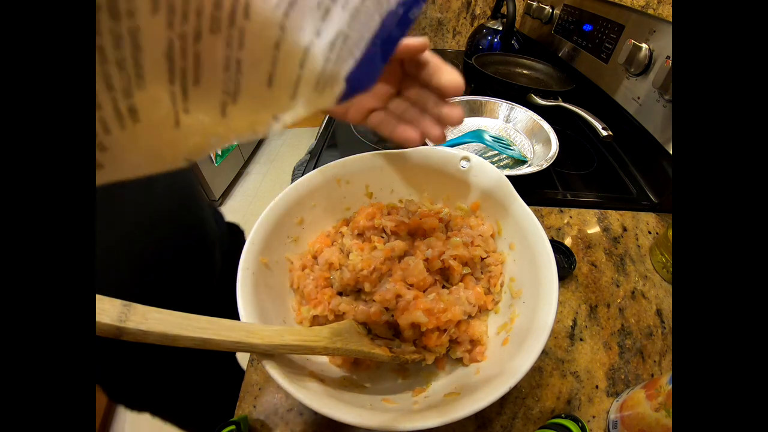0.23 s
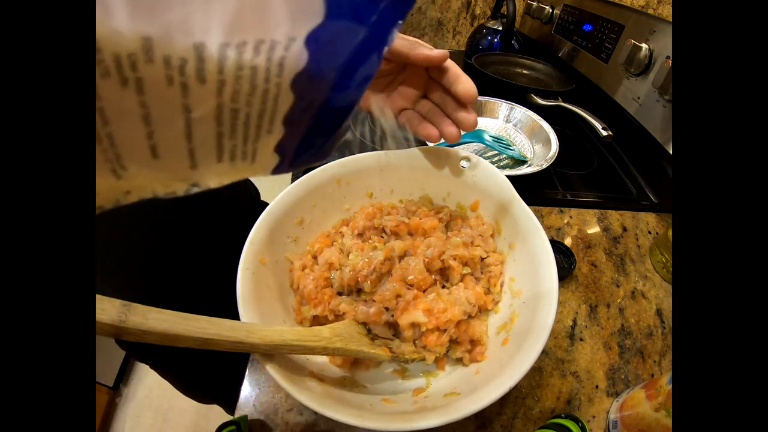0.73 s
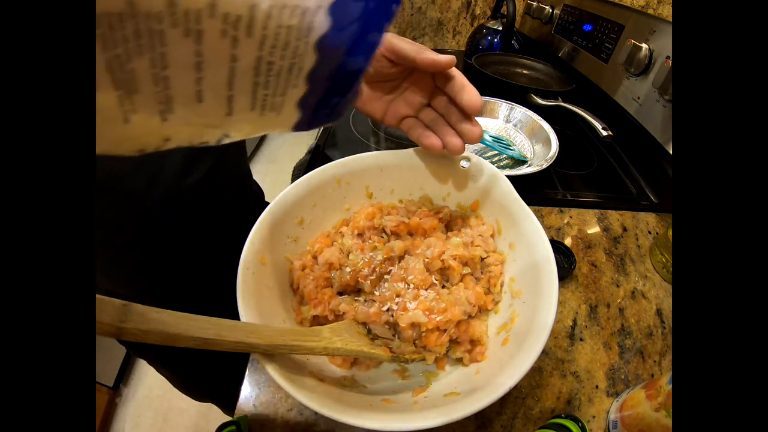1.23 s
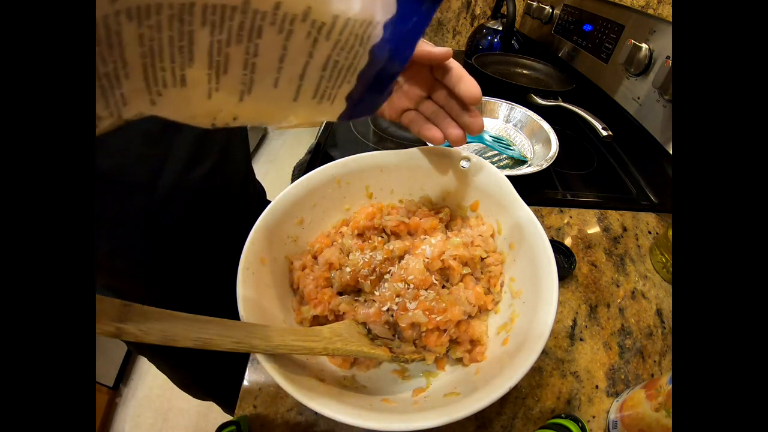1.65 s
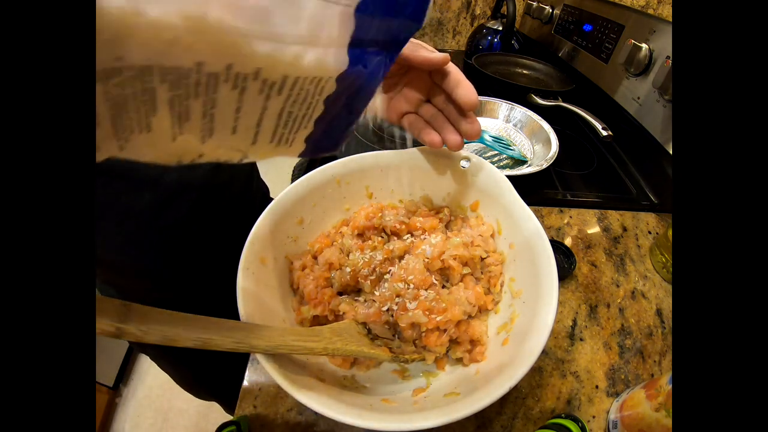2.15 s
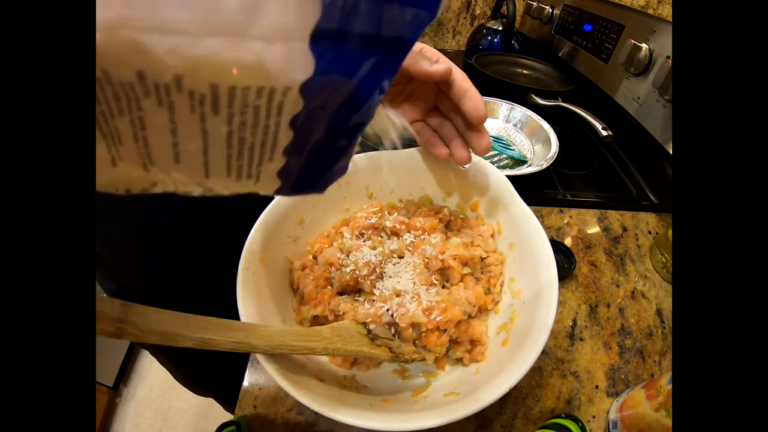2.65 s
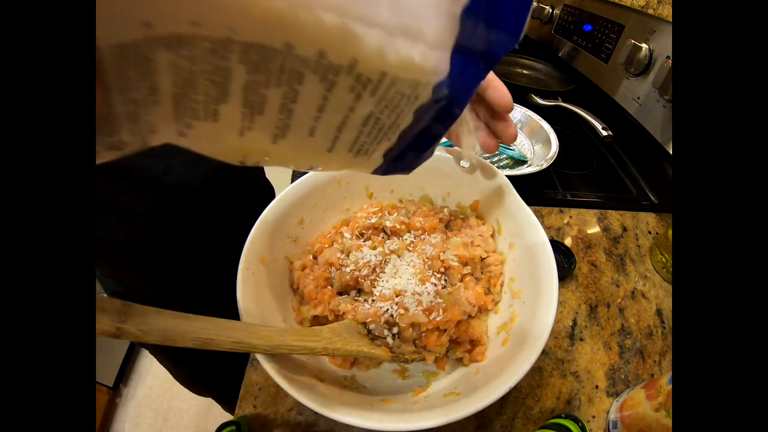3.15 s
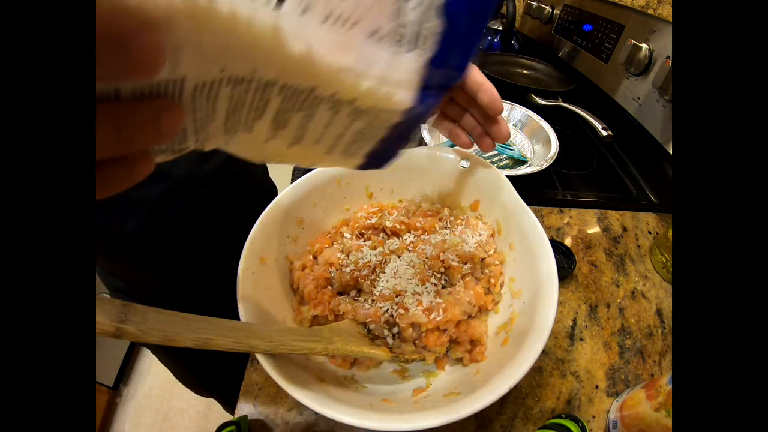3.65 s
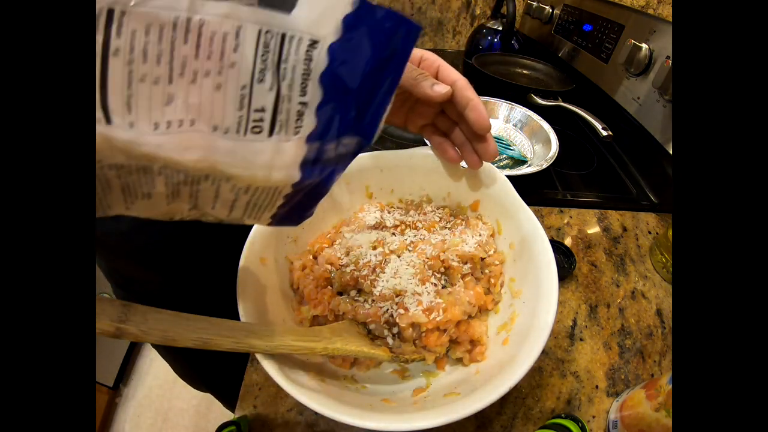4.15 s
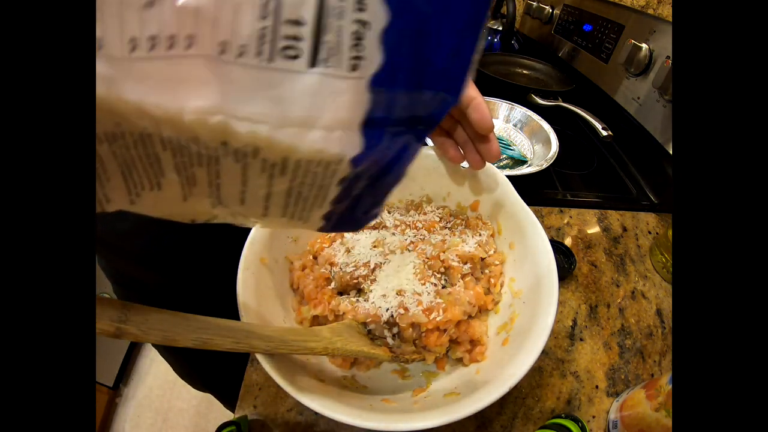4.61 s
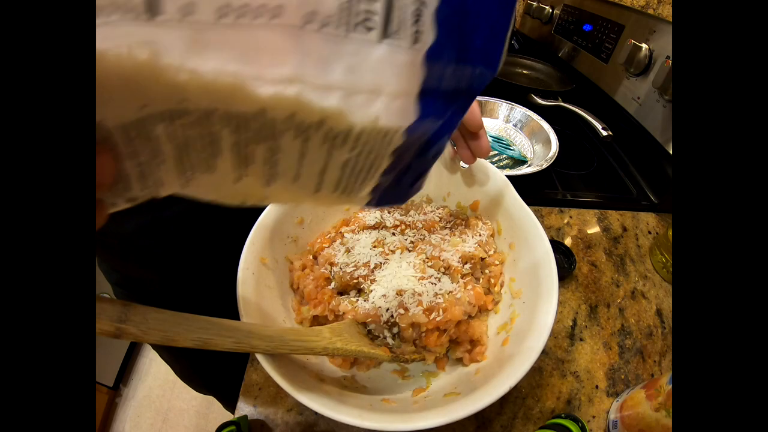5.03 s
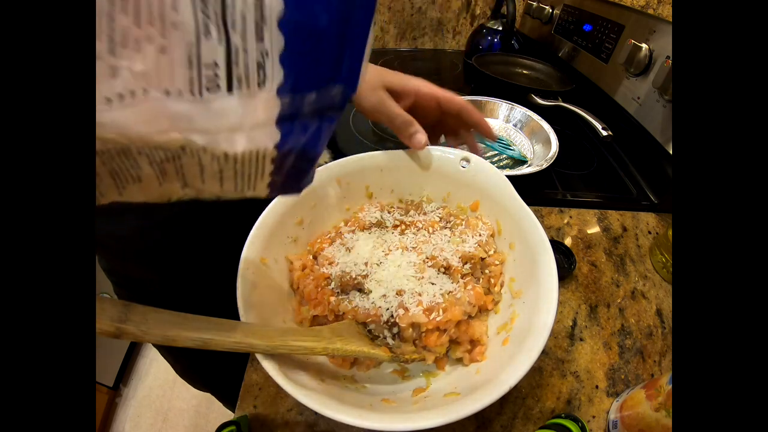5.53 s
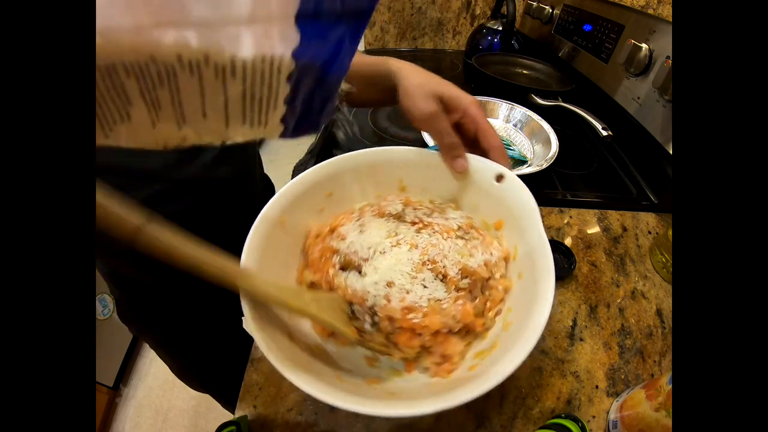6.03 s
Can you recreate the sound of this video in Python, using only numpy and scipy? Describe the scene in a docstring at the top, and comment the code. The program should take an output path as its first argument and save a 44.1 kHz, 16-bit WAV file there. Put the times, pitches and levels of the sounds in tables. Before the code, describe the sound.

Dry crumbs rush and patter out of a crinkling plastic bag in quick shakes, with sharp film snaps over a low kitchen fan drone.

```python
"""Dry crumbs slide out of a thin plastic bag held left of a small camera in a kitchen; a fan drones throughout.
At first bag and arm stir the air: low-passed and banded noise thuds at two microphone ports, two sines boom.
Crumbs rush, then thin out in flicks: random impulses ring film bands, while creases snap and panels pop.
Midway the bag swings in front, shifting the phase between the ports.
Near the end a fingernail taps the bowl: tick, noise spray and decaying sines; then the level drops sharply."""
import sys
import numpy as np
from scipy import signal
from scipy.fft import rfft, irfft, next_fast_len
from scipy.io import wavfile
from scipy.ndimage import uniform_filter1d

SR = 44100
rng = np.random.default_rng(int(sys.argv[2]) if len(sys.argv) > 2 else 0)


def waveform_to_disk(signal):
    """Save audio, clipped to [-1, 1], as 16-bit WAV at the path in sys.argv[1]."""
    frames = np.transpose(np.atleast_2d(signal))
    scaled = np.clip(frames, -1, 1) * 32767
    samples = np.round(scaled).astype(np.int16)
    wavfile.write(sys.argv[1], SR, samples)


def linear_from_db(decibels):
    """Turn decibels (scalar or array-like) into linear amplitude factors; 0 gives 1."""
    return 10 ** (np.asarray(decibels, float) / 20)


N = 276507

# bag position: t/s, left minus right/dB before the common offset LEAN_OFFSET_DB
BAG_LEAN = [(0.0, 4.5), (1.06, 4.5), (3.2, 1.5), (5.45, 1), (5.71, 0.5), (6.25, 0)]
# crumb slide as the bag tilts: t/s, level/dB
CRUMB_FLOW = [(0.0, -43), (0.4, -38.5), (0.72, -40.5), (0.88, -45.5), (1.35, -52), (1.55, -58), (1.77, -61),
              (2.05, -41.5), (2.6, -45.5), (2.76, -52.5), (2.92, -66), (3.33, -55.5), (3.75, -46.5),
              (4.2, -49.5), (4.55, -53.5), (4.85, -57.5), (5.25, -48), (5.72, -60), (5.97, -59.5),
              (6.25, -53)]
# wrist flicks, short rushes of crumbs: peak t/s, level/dB, fade/s
WRIST_FLICKS = [(0.0, -39, 0.046), (0.124, -35.5, 0.21), (0.196, -39.5, 0.031), (0.268, -33, 0.062),
                (0.329, -38, 0.052), (0.445, -34.5, 0.13), (0.571, -35, 0.065), (0.632, -45, 0.034),
                (0.691, -39.5, 0.1), (0.804, -41.5, 0.067), (0.936, -42, 0.076), (1.045, -44.5, 0.1),
                (1.116, -46.5, 0.047), (1.17, -51, 0.097), (1.395, -47, 0.02), (1.42, -43, 0.054),
                (1.497, -44.5, 0.24), (1.612, -52, 0.051), (1.695, -48.5, 0.16), (1.812, -45, 0.023),
                (1.853, -43.5, 0.18), (1.986, -38.0, 0.13), (2.115, -39, 0.089), (2.225, -39, 0.052),
                (2.35, -42.5, 0.071), (2.419, -42, 0.032), (2.488, -40.5, 0.042), (2.523, -48.5, 0.056),
                (2.627, -46.5, 0.13), (2.718, -44.5, 0.016), (2.834, -53.5, 0.041), (2.961, -58, 0.064),
                (3.103, -53, 0.045), (3.11, -50, 0.17), (3.201, -51, 0.14), (3.375, -45.5, 0.022),
                (3.473, -47, 0.17), (3.523, -42.5, 0.05), (3.607, -45.5, 0.062), (3.671, -44.5, 0.019),
                (3.739, -42.5, 0.18), (3.862, -43.5, 0.095), (3.966, -51, 0.1), (4.073, -47, 0.061),
                (4.254, -49, 0.082), (4.376, -46, 0.15), (4.489, -54, 0.067), (4.697, -53.5, 0.14),
                (4.778, -51, 0.071), (4.875, -53, 0.034), (4.978, -47, 0.047), (5.044, -46, 0.1),
                (5.151, -42.5, 0.1), (5.236, -49.5, 0.054), (5.338, -48.5, 0.12), (5.482, -50, 0.12),
                (5.595, -52, 0.076), (5.66, -54, 0.045), (5.843, -52, 0.13), (6.044, -53.5, 0.07),
                (6.163, -50.5, 0.088)]
# grip on the film: t/s, body re rustle level/dB, fine fizz re rustle level/dB
FILM_TENSION = [(0.0, -1.5, 2.5), (.2, -7.5, -1.5), (.4, -5.5, 0.5), (1.08, -8, -2), (1.3, -5.5, -2.5),
                (1.8, -7, -2), (2.35, -9.5, -2.5), (3.0, -9.5, -2), (3.25, -7.5, 0), (3.8, -10, -3),
                (4.3, -13, -2), (4.68, -9, -0.5), (4.9, -9, -3.5), (5.55, -14, -1.5), (5.78, -11, 1),
                (5.95, -6.5, -4.5), (6.15, -7, -5.5)]
# strongest film ringing, shifts with grip: t/s, f/Hz
FILM_RINGING = [(0.0, 3540), (0.27, 3430), (0.4, 3670), (0.45, 3180), (0.58, 3720), (0.71, 2680),
                (0.79, 3970), (0.94, 2820), (1.16, 3420), (1.43, 2550), (1.55, 3070), (1.72, 2300),
                (1.77, 3300), (1.98, 2510), (2.13, 3150), (2.45, 3130), (2.7, 2750), (3.11, 2520),
                (3.5, 2840), (4.4, 2940), (4.78, 2740), (4.88, 3100), (4.99, 2310), (5.04, 3160),
                (5.47, 2920), (5.61, 3900), (5.67, 2800), (5.87, 3660), (6.04, 3120), (6.09, 2370),
                (6.16, 2870), (6.24, 2500)]
# film resonances: f/Hz, half width at -6 dB/Hz
FILM_PATCHES = [(1500, 350), (2200, 1430), (2800, 980), (3500, 780), (4500, 1950), (6000, 3500)]
# rustle colour: f/Hz, relative level/dB
FILM_COLOUR = [(150, -26.5), (250, -13), (420, -14), (700, -10.5), (1350, -2), (1900, 0), (2700, -0.5),
               (3400, -0.5), (4300, 0.5), (5500, 1.5), (7300, -0.5), (8300, -5.5), (9300, -8.5),
               (11500, -22.5), (14200, -27.5), (15600, -39)]
# snapping creases: start t/s, level/dB, f/Hz, left minus right/dB, rattle level/dB
CREASE_SNAPS = [(0.0747, -23, 3480, 2, -4), (0.0993, -14, 4000, 4, -5), (0.7926, -28.5, 3800, -4, -1),
                (0.9931, -27, 3250, 1, -7), (1.0445, -24, 3320, 8, -7.5), (1.1181, -19, 3980, 2, -15.5),
                (1.2385, -36, 2600, 3, -11), (1.2975, -32, 2200, 6, -19), (1.7355, -33, 2000, 3, -18),
                (1.6213, -34, 2960, 4, 1), (1.6341, -34, 3000, 2, -7), (1.7045, -22.5, 2090, 5, -27),
                (1.7772, -40, 2950, -2, 0), (1.9899, -23, 2470, -5, -19), (2.3361, -19.5, 3380, 7, -16),
                (2.3487, -19, 3690, 1, -9), (2.6184, -33, 2970, 3, -9), (2.7244, -32, 2500, 1.5, -10),
                (3.0245, -37, 2500, 0.4, -9), (3.068, -33, 5000, -2, -6), (3.0926, -26, 2100, 1.0, -16),
                (3.1023, -28, 2800, 0.4, -10), (3.212, -32.5, 3000, -1, -0.5),
                (3.2198, -38, 2600, 0.4, -10), (3.2439, -37, 3000, 0.4, -6), (3.4092, -33, 5000, 0.4, -7),
                (3.5294, -22.5, 3650, -2, -8), (3.58, -30, 2940, 1.0, -13), (4.4064, -42, 3000, 0.4, -12),
                (4.5072, -30.5, 2460, 1.0, -14), (4.7093, -40, 3500, 0.4, -4), (4.7558, -29, 2200, 0.4, -9),
                (4.7983, -27, 2200, 0.4, -14), (5.0459, -28, 3400, 1.5, -18), (5.0661, -26, 3200, 2, -18),
                (5.1297, -26, 4160, 3, -13), (5.7845, -45, 3590, -1.2, 3), (6.147, -37, 2750, -1.2, -16),
                (6.1567, -32, 2900, -1.2, -10), (6.1674, -29, 2600, -4, -20)]
# larger film panels popping through: start t/s, level/dB, wobble f/Hz, left minus right/dB
PANEL_POPS = [(0.072, -25, 880, 8), (0.395, -42, 832, 10), (0.993, -35, 450, 8), (1.702, -45, 705, 15),
              (1.888, -32.5, 659, 2), (2.218, -22, 656, 6), (2.346, -29, 708, 7), (2.411, -31, 296, 10.5),
              (6.18, -49, 800, 0)]
# fingernail on bowl: start t/s, level/dB, left minus right/dB
NAIL_TAP = [(5.7184, -24, -5)]
# bowl modes: f/Hz, relative level/dB, T60/s
BOWL_MODES = [(2300, 0, 0.042), (2570, 8.5, 0.023), (3150, -11, 0.02), (3600, -2, 0.023), (4270, -5, 0.024),
              (7050, -6, 0.04), (7540, 0, 0.029), (8300, -10, 0.026)]
# port phase: f/Hz, left lead with bag aside/rad, left lead with bag in front/rad
PORT_LEAD = [(300, 0, 0), (690, -.4, -.2), (1030, -1.6, -.7), (2700, -1, -.3), (3950, 0, 0),
             (5200, 1.5, .7), (7400, 2.5, 1.5), (8300, 3.8, 3.2), (10700, 4.4, 3.6), (14500, 7.8, 5)]
# camera body shadow: f/Hz, left minus right/dB
PORT_SHADOW = [(200, 1), (500, 4), (1000, 7), (3000, 4), (6500, 0), (7400, -1), (8300, -4), (9300, 5),
               (12400, 3), (15000, 4)]
# sound arriving via walls and bowl: f/Hz, share/1
SCATTER_SHARE = [(300, .2), (700, .55), (1300, .35), (2200, .45), (4000, .2), (6000, .5), (9000, .7),
                 (12500, .95)]
# hand closing on the full bag: peak t/s, thud level/dB, fade/s
GRAB_THUDS = [(.085, -44, 0.047)]
# faint deep thump of air as the bag moves: peak t/s, level/dB, fade/s
AIR_THUMPS = [(3.72, -82, .2)]
# full bag booming under the grab: peak t/s, level/dB, fade/s, f/Hz
BAG_BOOMS = [(.082, -40, 0.058, 204.7), (.095, -42, 0.036, 88.3)]
# gusts from arm and bag: peak t/s, rumble level/dB, fade/s
AIR_GUSTS = [(.19, -50, 0.063), (.35, -56.5, 0.079), (.56, -58.5, 0.065), (.97, -67, 0.17),
             (1.13, -60, .07), (1.3, -70, 0.11), (2.0, -74, .15), (2.49, -65, .08), (3.7, -74, .25)]
# fan air resonances: f/Hz, full width at -6 dB/Hz, relative level/dB
FAN_DRONE = [(165.4, 43.4, -4.5), (199.4, 37, -4)]
# drone swells: peak t/s, level/dB, fade/s
DRONE_SWELLS = [(2.48, -53, 0.073), (2.8, -52, 0.084), (3.45, -52.5, 0.15), (3.9, -56.5, 0.42),
                (6.1, -60, 0.16)]
# room hiss colour: f/Hz, relative level/dB
KITCHEN_COLOUR = [(15, -44), (25, -12), (102, -15), (190, -6.5), (335, -5), (394, -4), (503, -15),
                  (714, -4.5), (988, -24), (1560, -12), (2610, -16), (3520, -11), (7920, -18.5),
                  (13200, -43), (16000, -45)]

KITCHEN_DB, FAN_DB, FAN_WAVER_DB = -59.5, -61, 1.5
LEAN_OFFSET_DB = 2.5
ROOM_T60_S = 0.11
FRONT_S, TURN_S = 2.6, 0.47  # middle and length of the swing to the front
SETTLED_S, SETTLE_FADE_S = 0.74, 0.058  # middle and length of the fade of the stirring
STIR_THUD_DB, STIR_THUMP_DB = -55.5, -61.5
STILL_THUMP_DB, STILL_RUMBLE_DB = -93.5, -94
RISE_SHARE = 0.57  # burst rise time re its fade time
SLIPS_PER_S, SLIP_FADE_S = 60, 0.015
END_S, END_FADE_S = 6.25, 0.00093

SIZE = next_fast_len(N + SR)
HZ = np.maximum(np.arange(SIZE // 2 + 1) * SR / SIZE, 1)
TIME = np.arange(N) / SR
SIGNS = np.array([[1], [-1]])  # left, right
HALVES = SIGNS / 2  # splits a left minus right difference


def over_hz(table, order=1):
    """One table column interpolated over log frequency."""
    rows = np.array(table)
    return np.interp(np.log(HZ), np.log(rows[:, 0]), rows[:, order])


def over_time(table):
    """Table columns interpolated at every sample."""
    s, *columns = np.transpose(table)
    return [np.interp(TIME, s, column) for column in columns]


def shape(x, response):
    """Filter by a frequency response."""
    return irfft(rfft(x, SIZE) * response, SIZE)[..., :N]


def unit(x):
    """Scale to rms 1."""
    return x / np.sqrt(np.mean(x ** 2))


def bandpass(x, lo_hz, hi_hz):
    """Fourth-order Butterworth band."""
    return signal.sosfilt(signal.butter(2, [lo_hz, hi_hz], "band", fs=SR, output="sos"), x)


def walk(rate_hz):
    """Random levels held 1 / rate_hz and slewed twice; rms 1."""
    hold = int(SR / rate_hz)
    steps = np.repeat(rng.standard_normal(N // hold + 1), hold)
    return unit(uniform_filter1d(uniform_filter1d(steps, hold), hold)[:N])


def bursts(table):
    """Amplitude of bell-shaped bursts, 20 dB down one fade time after the peak; powers add."""
    t = TIME[::64]
    s, db, fade_s = np.transpose(table)[:, :, None]
    away = (t - s) / (fade_s * np.where(t < s, RISE_SHARE, 1))
    power = np.sum(linear_from_db(db - 20 * away ** 2) ** 2, axis=0)
    return np.interp(TIME, t, np.sqrt(power))


def at_ports(x, share):
    """Direct sound shadowed by the camera body, plus a short scattered tail unlike at each port."""
    t = np.arange(SR // 2) / SR
    tail = rfft(rng.standard_normal((2, len(t))) * linear_from_db(-60 * t / ROOM_T60_S), SIZE)
    # many paths smear the time but leave the colour even
    tail = tail / np.abs(tail)
    shadow = linear_from_db(HALVES * over_hz(PORT_SHADOW))
    return shape(x, shadow * (np.sqrt(1 - share) + np.sqrt(share) * tail))


def port_phase(x):
    """Phase between the ports by frequency, crossfaded as the bag swings from the side to the front."""
    aside, ahead = (shape(x, np.exp(1j * HALVES * over_hz(PORT_LEAD, order=k))) for k in (1, 2))
    turn = np.clip((TIME - FRONT_S) / TURN_S + .5, 0, 1)
    return (1 - turn) * aside + turn * ahead


def slips():
    """Crumbs let go in random sudden jumps that each die away; mean 0, rms 1."""
    jumps = (rng.random(N) < SLIPS_PER_S / SR) * rng.exponential(size=N)
    x = signal.lfilter([1], [1, -np.exp(-1 / (SLIP_FADE_S * SR))], jumps)
    return unit(x - x.mean())


def crumbs(per_s, spread_db, flutter_db, slip):
    """Impacts at random moments, a few much harder than the rest, bunched in quick slips."""
    hit = rng.random(N) < per_s / SR
    size = linear_from_db(spread_db * np.minimum(rng.exponential(size=N), 5.0))
    bunching = linear_from_db(flutter_db * np.minimum(slip, 2.4))
    return unit(hit * size * rng.standard_normal(N) * bunching)


def film_patches(slip, share):
    """Struck film resonances; the patch nearest the present tension rings most."""
    (ring_hz,) = over_time(FILM_RINGING)
    middle = 0
    for hz, width_hz in FILM_PATCHES:
        nearness = np.exp(-(np.log(hz / ring_hz) / 0.36) ** 2)
        # the emptier the bag, the freer its film rings
        taut = linear_from_db((5.0 + 0.68 * TIME) * nearness + 1.34 * walk(14))
        patch_slip = 0.52 * (slip + slips())
        hits = crumbs(per_s=2000, spread_db=2.0, flutter_db=2.5, slip=patch_slip)
        resonance = 1 / (1 + 1j * (HZ - hz) / width_hz) ** 2
        middle = middle + shape(at_ports(hits * taut, share), linear_from_db(over_hz(FILM_COLOUR)) * resonance)
    # the hand sets the loudness, whichever patch rings
    return middle / np.sqrt(uniform_filter1d(np.mean(middle ** 2, axis=0), size=2200))


def rustle():
    """Crumb impacts excite the film's low body, middle resonances and high fizz."""
    level = np.hypot(linear_from_db(over_time(CRUMB_FLOW)[0]), bursts(WRIST_FLICKS))
    body_db, fizz_db = over_time(FILM_TENSION)
    share, slip = over_hz(SCATTER_SHARE), slips()
    coarse = sum(at_ports(crumbs(per_s=4000, spread_db=3.0, flutter_db=2.5, slip=slip), share)
                 for stream in range(2))
    fine = sum(at_ports(crumbs(per_s=2500, spread_db=3.5, flutter_db=1.5, slip=slip), share)
               for stream in range(5))
    colour = linear_from_db(over_hz(FILM_COLOUR))
    body = unit(shape(coarse, colour / (1 + (HZ / 1300) ** 4)))
    fizz = unit(shape(fine, colour / (1 + (6800 / HZ) ** 6)))
    middle = film_patches(slip, share)
    return level * (linear_from_db(body_db) * body + linear_from_db(2.5) * middle + linear_from_db(fizz_db) * fizz)


def blows(table, length_s, pulse, panned):
    """One short sound per table row, leaning left or right by column panned."""
    out, t = np.zeros((2, N)), np.arange(int(length_s * SR)) / SR
    for row, noise in zip(table, rng.standard_normal((len(table), len(t)))):
        s, db, pan_db = row[0], row[1], row[panned]
        sound = pulse(t, *row[2:panned], noise, *row[panned + 1:])
        start = int(s * SR)
        out[:, start:start + len(t)] += linear_from_db(db + HALVES * pan_db) * sound
    return out


def snap(t, hz, noise, ring_db):
    """A crease flips in one sharp cycle, then the film rattles for a few milliseconds."""
    late = np.maximum(t - .0012, 0)
    flip = np.sin(2 * np.pi * hz * late) * np.exp(-late * hz * 1.7)
    rattle = unit(bandpass(noise, 1850, 7400)) * np.exp(-late / 0.0017) * (late > 0)
    return bandpass(1.13 * flip + linear_from_db(ring_db) * rattle, 1440, 12000)


def pop(t, hz, noise):
    """A panel pushes air once in a short blunt pulse, wobbles and shivers."""
    late = np.maximum(t - .0035, 0)
    push = -np.sin(np.pi * np.minimum(late / 0.00029, 1)) ** 2
    wobble = np.sin(2 * np.pi * hz * late) * np.exp(-late / 0.00052)
    shiver = unit(bandpass(noise, 240, 1650)) * np.exp(-late / 0.0093) * (late > 0)
    mix = 2.2 * push + 0.44 * wobble + 0.21 * shiver
    return bandpass(bandpass(mix, 240, 4400), 150, 8000)


def tap(t, noise):
    """A hard tick, a spray of near echoes and the brief ring of the bowl."""
    late = np.maximum(t - .0012, 0)
    tick = np.sin(2 * np.pi * 5000 * late) * np.exp(-late / 0.000072)
    spray = unit(bandpass(noise, 1700, 8000)) * np.exp(-late / 0.0034) * (late > 0)
    ring = sum(linear_from_db(db - 60 * late / t60_s) * np.sin(2 * np.pi * hz * late) for hz, db, t60_s in BOWL_MODES)
    mix = 1.5 * tick + 0.2 * spray + 0.14 * ring
    return bandpass(bandpass(mix, 2100, 11500), 2000, 18000)


def air(response, unlike):
    """Coloured noise, partly common to both ports, a little stronger at the left."""
    mid, side = rng.standard_normal((2, N))
    return unit(shape(mid + unlike * side * SIGNS, response) * linear_from_db(0.56 * HALVES))


def swing():
    """Air moved by bag and arm buffets the ports; the full bag booms under the grab."""
    thud = air(1 / (1 + ((HZ - 230) / 140) ** 4), 0.54)
    thump = air(1 / (1 + ((HZ - 90) / 19) ** 6), 0.14)
    rumble = air(1 / (1 + ((HZ - 30) / 14) ** 4), 0.27)
    stir = np.clip((SETTLED_S - TIME) / SETTLE_FADE_S + .5, 0, 1) * linear_from_db(1.6 * walk(11.0))
    boom = sum(bursts([row[:3]]) * np.sin(2 * np.pi * row[3] * TIME) for row in BAG_BOOMS)
    thud_level = bursts(GRAB_THUDS) + linear_from_db(STIR_THUD_DB) * stir
    thump_level = bursts(AIR_THUMPS) + linear_from_db(STIR_THUMP_DB) * stir + linear_from_db(STILL_THUMP_DB)
    rumble_level = bursts(AIR_GUSTS) + linear_from_db(STILL_RUMBLE_DB)
    return boom * linear_from_db(1.2 * SIGNS) + thud_level * thud + thump_level * thump + rumble_level * rumble


def kitchen():
    """Steady room hiss and a fan whose air resonances swell and fade."""
    drone = sum(linear_from_db(db + 2.0 * walk(9)) * air(1 / (1 + ((HZ - hz) / width_hz * 2) ** 4), 0.12)
                for hz, width_hz, db in FAN_DRONE)
    drone_level = np.hypot(linear_from_db(FAN_DB + FAN_WAVER_DB * walk(2.92)), bursts(DRONE_SWELLS))
    hiss = air(linear_from_db(over_hz(KITCHEN_COLOUR)), 0.61)
    return drone_level * drone + linear_from_db(KITCHEN_DB) * hiss


def scene():
    """Bag, creases, tap and room together."""
    lean_db = (over_time(BAG_LEAN)[0] - LEAN_OFFSET_DB) * HALVES
    creases = blows(CREASE_SNAPS, .03, snap, panned=3) + blows(PANEL_POPS, .05, pop, panned=3)
    # the microphone dulls the top of the creases
    hits = shape(creases, 1 / (1 + (HZ / 11000) ** 4))
    nail = blows(NAIL_TAP, .06, tap, panned=2)
    echo = linear_from_db(-6.5) * at_ports((hits + nail).mean(axis=0), 0.91)
    bag = port_phase(linear_from_db(lean_db) * rustle() + hits + echo)
    return bag + nail + kitchen() + swing()


def band_limit(x):
    """A steep low-pass at the top of the band."""
    return signal.sosfilt(signal.butter(12, 15720, fs=SR, output="sos"), x)


def record(dry):
    """Just short of the end the level falls to 3 percent within a millisecond."""
    mix = dry * np.clip((END_S - TIME) / END_FADE_S, .03, 1)
    return band_limit(mix)


dry = scene()
out = record(dry)
waveform_to_disk(out)
```